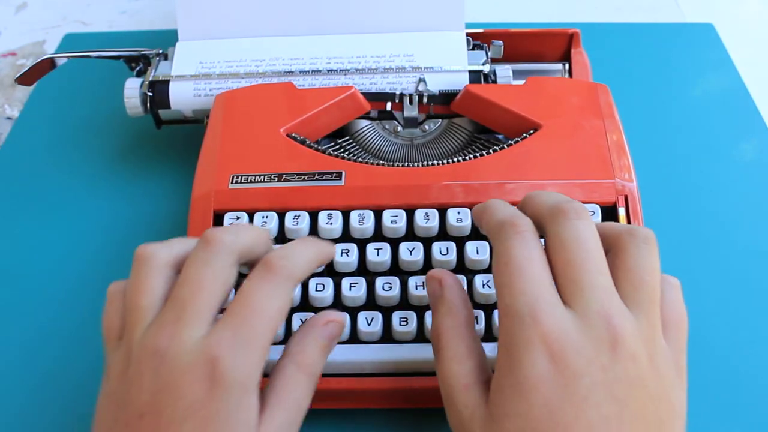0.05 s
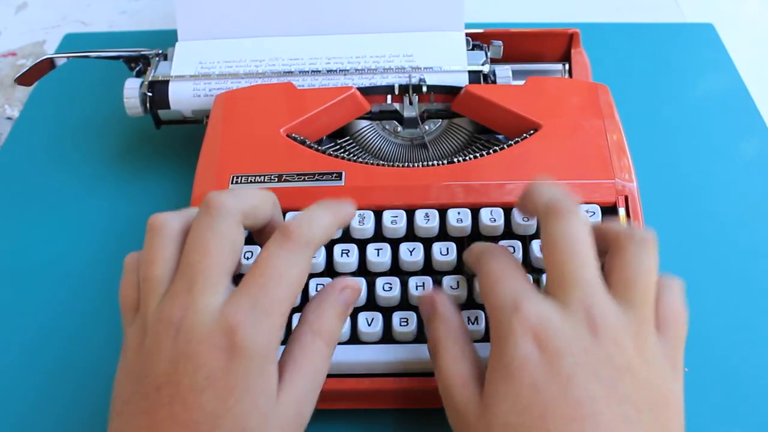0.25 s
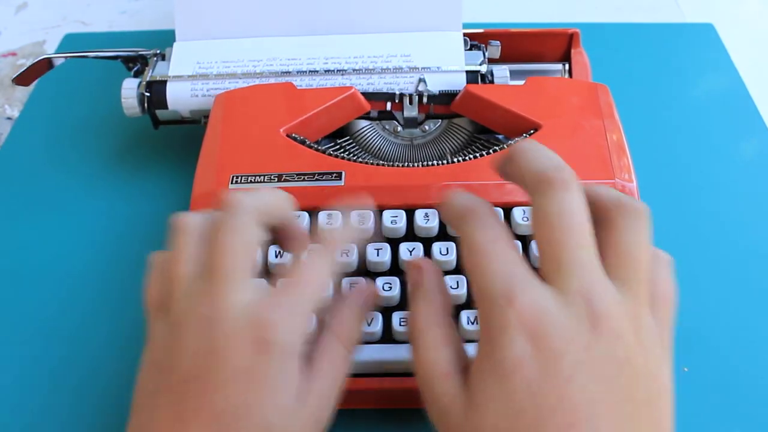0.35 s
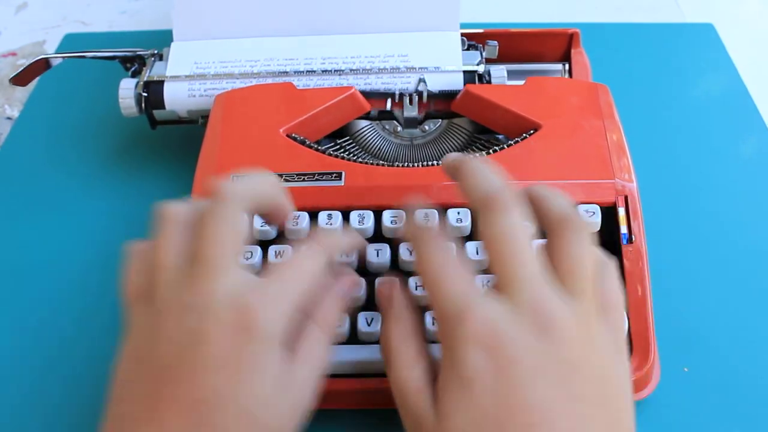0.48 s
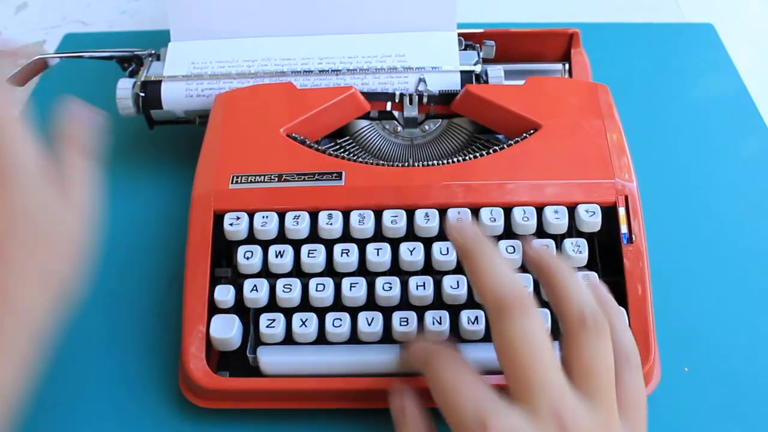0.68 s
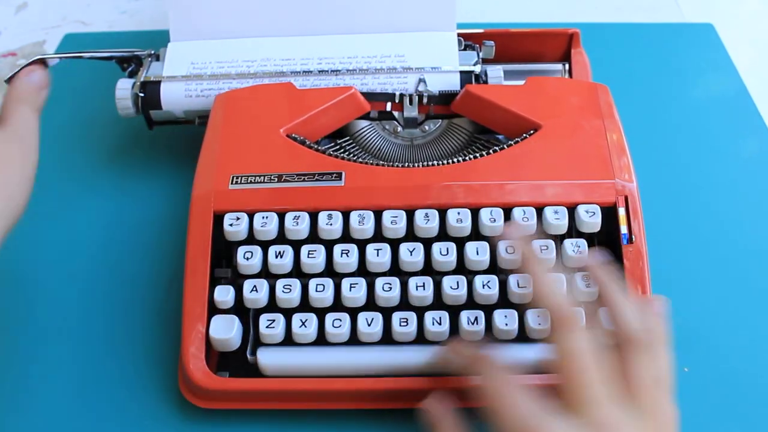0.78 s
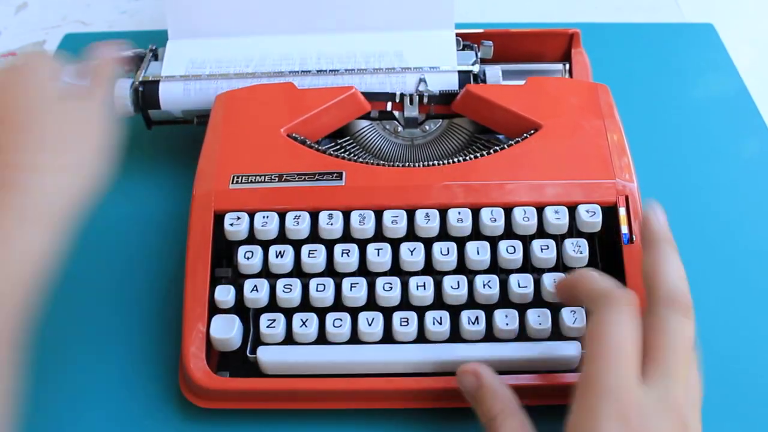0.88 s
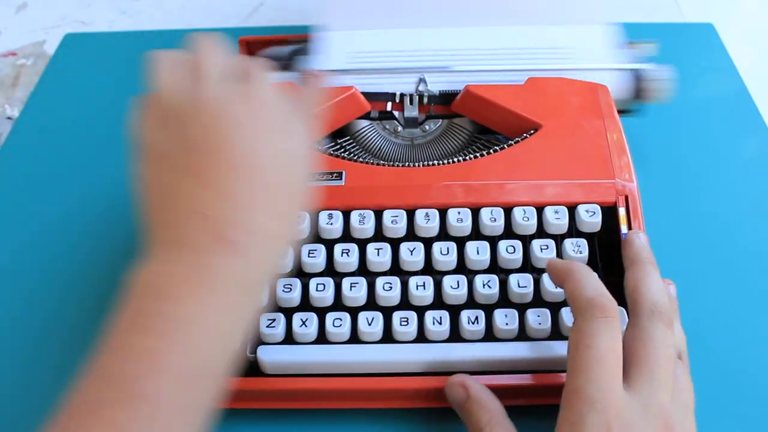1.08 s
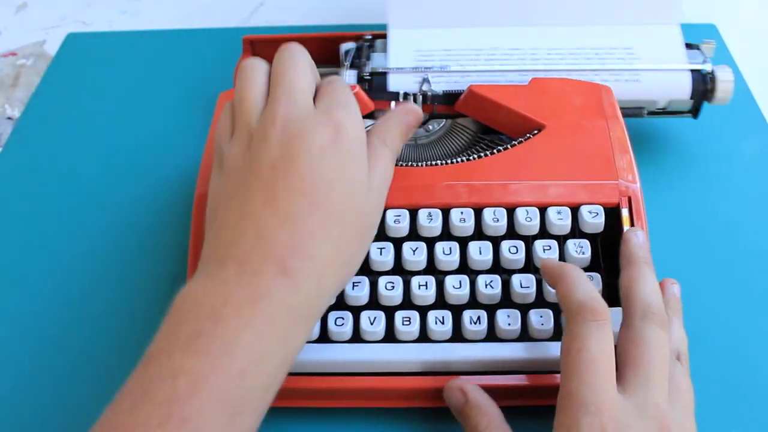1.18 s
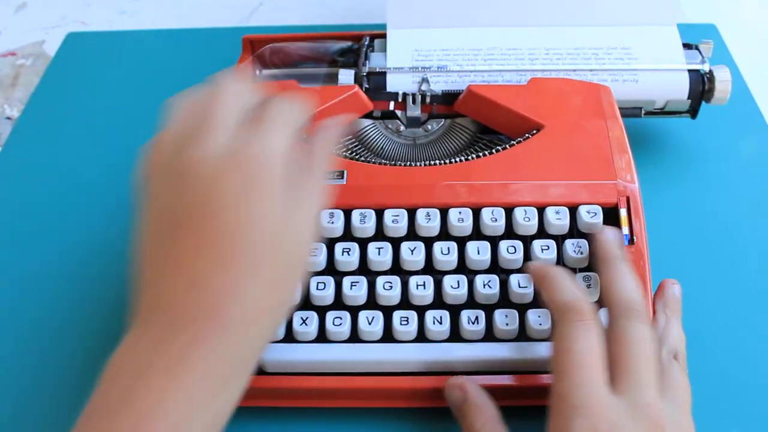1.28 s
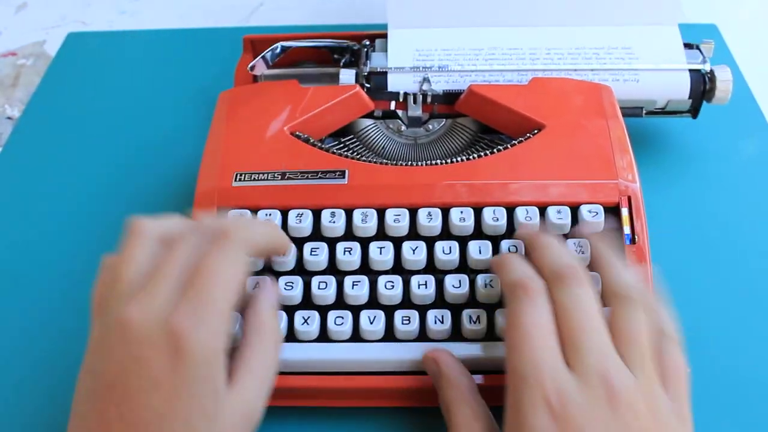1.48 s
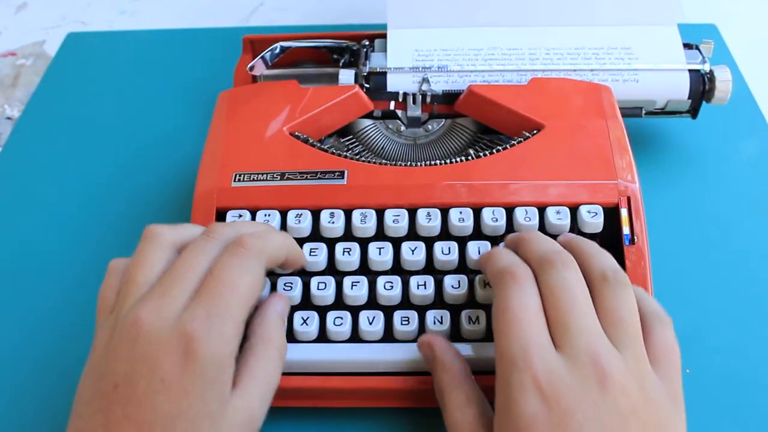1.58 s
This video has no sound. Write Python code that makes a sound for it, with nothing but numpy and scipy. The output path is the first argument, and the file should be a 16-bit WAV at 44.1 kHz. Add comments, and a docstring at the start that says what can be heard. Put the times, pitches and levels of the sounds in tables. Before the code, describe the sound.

A small mechanical typewriter types three letters, then its carriage ratchets, slides back and slams home.

```python
"""A quiet room: a small manual typewriter on a desk, heard close. Three letters and the space bar, then the
return lever ratchets the platen, the carriage slides on its rail and slams into the margin stop, and the
lever springs back. Contacts are fading sprays of tiny knocks filtered by damped modes and a broad shell
response; desk modes thump, filtered knocks make the slide, thin steel sings as sines, the room is
coloured noise."""
import sys
import numpy as np
from scipy import signal
from scipy.fft import rfft, irfft
from scipy.io import wavfile
from scipy.ndimage import uniform_filter1d

SR = 44100
rng = np.random.default_rng(int(sys.argv[2]) if len(sys.argv) > 2 else 0)


def to_linear_factor(level_db):
    """Convert decibel levels (scalar or array-like) to linear amplitude factors."""
    exponent = np.asarray(level_db, float) / 20
    return 10 ** exponent


def log_audio(samples):
    """Write samples as a 16-bit WAV file to the path given in sys.argv[1]."""
    # one column per channel
    frames = np.atleast_2d(samples).T
    # limit to full scale, then quantise
    limited = np.clip(frames, -1, 1)
    pcm = np.round(limited * 32767).astype(np.int16)
    wavfile.write(sys.argv[1], SR, pcm)


N = 72765
SIZE = 16384  # samples per contact

# frame modes: (frequency [Hz], level [dB], t60 [s])
FRAME_MODES = [(620, -6, .03), (770, -3, .03), (940, -3, .03), (1100, -5, .025), (1450, -5, .022),
               (1790, -3, .025), (1960, -2, .025), (2740, -3, .015), (3100, -5, .015), (3850, -5, .012),
               (4700, -6, .012), (5200, -6, .01), (5900, -8, .01), (6600, -9, .01), (10000, -14, .012)]
# treble softened by the air on its way to the microphone: (frequency [Hz], level [dB])
AIR_LOSS = [(8000, 0), (11000, -3), (13000, -6.5), (14500, -13), (16000, -24)]


def unit(x):
    """Scale to rms 1."""
    return x / np.sqrt(np.mean(np.abs(x) ** 2))


def colour(points, size):
    """Causal (minimum-phase) response through (Hz, dB) points, by folding the cepstrum."""
    point_hz, point_db = np.array(points).T
    hz = np.maximum(np.fft.rfftfreq(size, 1 / SR), 1)
    log_gain = np.interp(np.log(hz), np.log(point_hz), point_db) * np.log(10) / 20
    cepstrum = irfft(log_gain, size)
    cepstrum[1:size // 2] *= 2
    cepstrum[size // 2 + 1:] = 0
    return np.exp(rfft(cepstrum))


def rings(modes, size, extra_db=0):
    """Spectrum of a sum of exponentially damped sine modes, rms 1."""
    t = np.arange(SIZE // 2)[:, None] / SR
    hz, db, t60_s = np.array(modes).T
    response = to_linear_factor(db + extra_db - 60 * t / t60_s) * np.sin(2 * np.pi * hz * t)
    return unit(rfft(response.sum(axis=1), size))


def knocks(count):
    """Dense tiny metal contacts of uneven size, rms 1."""
    scatter_db = 2
    size_db = -scatter_db * np.log(rng.random(count) + 1e-9)
    return unit(to_linear_factor(size_db) * rng.standard_normal(count))


def add(out, start_s, x, db):
    """Mix x into out at a time and level."""
    i = int(start_s * SR)
    n = min(len(x), N - i)
    out[i:i + n] += x[:n] * to_linear_factor(db)


def clatter(contacts, modes):
    """Fading sprays of knocks; each contact favours one listed mode, the others scattered at random."""
    shell_db, ring_scatter_db, favour_db = 3, 3, 10
    snap_db, snap_t60_s, spray_s = -14.5, 0.002, 0.15  # snap: first touch, over the spray
    # unresolved plates: (frequency [Hz], level [dB per Hz])
    plates = [(180, -39.5), (300, -8.5), (584, 3.5), (762, 9.5), (1190, 1), (1780, 6), (3500, 0),
              (6200, -6), (9000, -8.5), (12000, -13), (16000, -35)]
    out, t = np.zeros(N), np.arange(SIZE) / SR
    shell = to_linear_factor(shell_db) * unit(colour(plates, SIZE))
    air_loss = colour(AIR_LOSS, SIZE)
    mode_hz = np.array(modes)[:, 0]
    for start_s, db, t60_s, tilt_db, ring_hz in contacts:
        fade = to_linear_factor(-60 * t / t60_s) + to_linear_factor(snap_db - 60 * t / snap_t60_s)
        spray = knocks(SIZE) * fade * (t < spray_s)
        mode_db = ring_scatter_db * rng.standard_normal(len(mode_hz))
        nearest = np.argmin(np.abs(np.log(mode_hz / ring_hz)))
        mode_db[nearest] = favour_db
        # three octaves either side of 2400 Hz
        tilt = colour([(300, -3 * tilt_db), (2400, 0), (19200, 3 * tilt_db)], SIZE)
        body = unit(tilt * air_loss * (rings(modes, SIZE, mode_db) + shell))
        add(out, start_s, irfft(rfft(spray) * body, SIZE)[:SIZE * 3 // 4], db)
    return out


def room_tone():
    """Soft hiss of the room and of hands moving: coloured noise with a slow level curve."""
    # hiss spectrum: (frequency [Hz], level [dB per Hz])
    hiss_colour = [(15, 6), (40, 5.5), (150, -1), (270, 0), (405, -1), (750, -2), (1370, -2), (3000, -13.5),
                   (6000, -25), (10000, -35.5), (16000, -55)]
    # hiss level: (time [s], level [dB])
    hiss_level = [(0, -46.5), (.22, -42), (.62, -47.5), (1.299, -38), (1.65, -43)]
    time_s, level_db = np.array(hiss_level).T
    noise = rng.standard_normal(N + 1)
    hiss = unit(irfft(rfft(noise) * colour(hiss_colour, N + 1), N + 1)[:N])
    return hiss * to_linear_factor(np.interp(np.arange(N) / SR, time_s, level_db))


def echo(machine):
    """Short dull echo: convolution with decaying low-passed noise of unit energy."""
    echo_db, t60_s, cutoff_hz = -21, 0.16, 3530
    t = np.arange(SIZE) / SR
    noise = signal.lfilter(*signal.butter(3, cutoff_hz, fs=SR), rng.standard_normal(SIZE))
    tail = noise * to_linear_factor(-60 * t / t60_s)
    tail = tail / np.sqrt(np.sum(tail ** 2))
    return to_linear_factor(echo_db) * signal.fftconvolve(machine, tail)[:N]


def pings():
    """Faint sustained partials of springs and thin bars: decaying sines, then damped."""
    rise_s, damp_s = 0.00067, 0.008
    # singing steel: (start [s], damped at [s], t60 [s], partials (frequency [Hz], level [dB]))
    thin_steel = [(0, 0.22, 1.1, [(8603, -56)]), (0.17, 0.243, 0.69, [(4522, -58), (6621, -60), (8759, -61),
                  (9798, -69), (10158, -73), (11003, -78), (12414, -67), (13491, -78)]),
                  (1.41, 1.56, 0.97, [(11400, -72)])]
    t, out = np.arange(N) / SR, np.zeros(N)
    for start_s, end_s, t60_s, partials in thin_steel:
        gate = np.clip((t - start_s) / rise_s, 0, 1) * np.clip((end_s - t) / damp_s, 0, 1)
        decay_db = -60 * np.maximum(t - start_s, 0) / t60_s
        for hz, db in partials:
            sine = np.sin(2 * np.pi * (hz * t + rng.random()))
            out += gate * to_linear_factor(db + decay_db) * sine
    return out


def thumps():
    """Soft pushes through the feet ring the desk, the mode levels scattered at random."""
    push_s, mode_scatter_db = 0.0028, 3
    # desk modes: (frequency [Hz], level [dB], t60 [s])
    desk_modes = [(59.6, -9, 0.084), (109.9, 4, 0.168), (144, -0.5, 0.092), (210, 0, 0.068),
                  (282, -13, 0.025)]
    # pushes: (time [s], peak level [dB])
    pushes = [(0.236, -31.5), (0.263, -30), (0.34, -31), (0.422, -34), (0.445, -28), (0.532, -35),
              (0.576, -34), (0.664, -42), (0.751, -30.5), (0.846, -32), (0.873, -33), (0.941, -22.5),
              (0.956, -31.5), (1.209, -19.5), (1.225, -25), (1.26, -24), (1.338, -27), (1.387, -36.5)]
    out = np.zeros(N)
    push = np.diff(np.hanning(int(push_s * SR)))
    for start_s, db in pushes:
        scatter_db = mode_scatter_db * rng.standard_normal(len(desk_modes))
        ringing = irfft(rings(desk_modes, SIZE, scatter_db), SIZE)[:SIZE // 2]
        thump = np.convolve(ringing, push)
        add(out, start_s, thump / np.abs(thump).max(), db)
    return out


def slide():
    """Rollers grind along the rail: dense knocks ring the frame, catching unevenly in each register."""
    ring_db, patchy_db = -13.5, 1.3
    # carriage on its rail: (time [s], level [dB])
    travel = [(.955, -64), (0.976, -35), (1.05, -34.5), (1.1, -32), (1.19, -31), (1.209, -33.5)]
    # grind spectrum: (frequency [Hz], level [dB per Hz])
    grind_colour = [(35, -23), (60, -11), (130, 1), (256, -13), (500, -14), (750, 1.5), (1900, -5),
                    (4750, -7.5), (7000, -12), (9350, -21), (13000, -29), (16000, -45)]
    # register edges: (frequency [Hz])
    band_edges_hz = (20, 500, 1200, 2500, 5000, 9000, 20000)
    time_s, level_db = np.array(travel).T
    body = unit(colour(grind_colour, N + 1)) + to_linear_factor(ring_db) * rings(FRAME_MODES, N + 1)
    spectrum = rfft(knocks(N), N + 1) * body * colour(AIR_LOSS, N + 1)
    hz = np.fft.rfftfreq(N + 1, 1 / SR)
    grind = np.zeros(N)
    for low_hz, high_hz in zip(band_edges_hz, band_edges_hz[1:]):
        band = irfft(spectrum * ((hz >= low_hz) & (hz < high_hz)), N + 1)[:N]
        wobble = uniform_filter1d(rng.standard_normal(N), size=160)
        wobble = unit(uniform_filter1d(wobble, size=80))
        grind += band * to_linear_factor(patchy_db * wobble)
    level = np.interp(np.arange(N) / SR, time_s, level_db, left=-120, right=-120)
    return unit(grind) * to_linear_factor(level)


def linkage():
    """Key levers, ribbon lift, escapement and space bar clatter on the frame."""
    # (time [s], level [dB], fade t60 [s], tilt [dB per octave], favoured ring [Hz])
    link_contacts = [(.2330, -21.5, 0.091, 1.5, 1450), (.246, -22.5, 0.075, -2, 940),
                     (.2578, -19.5, 0.052, 2, 3100), (.280, -34, 0.022, 1.5, 5900),
                     (.326, -29, 0.023, 1, 3100), (.336, -31, 0.072, 4, 10000), (.350, -30, .1, 1.5, 940),
                     (.361, -26.5, 0.058, 0, 1790), (.396, -38.5, 0.073, -0.5, 5900),
                     (.4205, -21.5, 0.032, .5, 2740), (.430, -28, 0.17, -1.5, 940),
                     (.4405, -22.5, 0.094, 5.5, 4700), (.462, -28, 0.036, 0, 5900),
                     (.512, -32.5, 0.056, 3.5, 3100), (.521, -37, 0.1, 4, 10000),
                     (.535, -29.5, 0.076, -1, 3100), (.546, -30, 0.11, -2, 940),
                     (.558, -30, 0.2, -2.5, 1100), (.5725, -40, 0.18, 2.5, 5900),
                     (.595, -23.5, 0.02, 0.5, 5900), (.643, -39, 0.033, 8, 3100),
                     (.653, -38.5, .06, 6, 10000), (.664, -33, 0.11, 1, 3100), (.675, -31.5, .05, -3, 1790),
                     (.700, -53, 0.091, 13, 5900), (.711, -41, 0.032, 1.5, 1450),
                     (.740, -40.5, 0.12, -2, 1450), (.7535, -19, 0.042, -2, 770),
                     (.765, -24.5, 0.069, -5, 1450), (.757, -17.5, 0.032, -3.5, 940),
                     (.807, -28, 0.017, -4, 1450), (.828, -40.5, .04, 0, 1960),
                     (1.559, -41.5, 0.09, 6.5, 5900), (1.571, -27, 0.017, -5.5, 1960),
                     (1.585, -36, 0.15, -7, 1790)]
    return clatter(link_contacts, FRAME_MODES)


def ratchet():
    """Return lever clicks the platen ratchet, then picks up the carriage, ringing the frame."""
    # (time [s], level [dB], fade t60 [s], tilt [dB per octave], favoured ring [Hz])
    ratchet_contacts = [(0.843, -23, 0.077, 0, 1960), (0.858, -18.5, 0.037, -1.5, 6600),
                        (0.876, -21, 0.041, -2, 1960), (0.88, -27, 0.17, -4.5, 1450),
                        (0.898, -31, 0.061, -2.5, 1450), (0.914, -29, 0.2, -1, 2740),
                        (0.931, -24.5, 0.031, 2, 5200), (.935, -26, 0.11, 1.5, 1960),
                        (0.945, -20.5, 0.077, 0.5, 1960), (.950, -21.5, 0.091, -14, 1960),
                        (.961, -48, 0.041, -10, 940), (1.095, -36, .02, 7, 3850)]
    return clatter(ratchet_contacts, FRAME_MODES)


def margin_stop():
    """Carriage hits the margin stop and rebounds, ringing the frame."""
    # (time [s], level [dB], fade t60 [s], tilt [dB per octave], favoured ring [Hz])
    stop_contacts = [(1.206, -16, 0.13, 3, 3850), (1.213, -12, 0.094, -2.5, 1790),
                     (1.22, -14, 0.086, 1.5, 940), (1.232, -14.5, 0.06, -2, 1960),
                     (1.263, -23, 0.052, -3, 1960)]
    return clatter(stop_contacts, FRAME_MODES)


def lever_return():
    """Lever springs home, its contacts ringing the arm's own modes."""
    # (time [s], level [dB], fade t60 [s], tilt [dB per octave], favoured ring [Hz])
    lever_contacts = [(1.316, -47, .05, 1.5, 3630), (1.3243, -14.5, 0.026, 3.5, 3630),
                      (1.328, -30.5, 0.27, -2.5, 2000), (1.340, -10.5, 0.014, 3.5, 3630),
                      (1.345, -19, 0.053, 5, 2730), (1.383, -22.5, 0.045, 6.5, 4800),
                      (1.392, -25, 0.074, -4.5, 716), (1.412, -24, 0.044, 4.5, 3630),
                      (1.435, -36.5, 0.05, 3.5, 2000), (1.455, -47, 0.028, 3, 5700)]
    # lever arm modes: (frequency [Hz], level [dB], t60 [s])
    arm_modes = [(716, -12, .025), (2000, -8, .012), (2730, -6, .01), (3630, 0, .014), (4800, -5, .008),
                 (5700, -8, .008), (7200, -10, .008), (8200, -11, .008)]
    return clatter(lever_contacts, arm_modes)


def strikes():
    """Type slug on the platen: a bright noise crack, then the type bar and frame clatter on."""
    crack_band_hz, hold_s, crack_t60_s, air_db = [3800, 7800], 0.0009, 0.003, -15
    clatter_t60_s, tilt_db_per_octave, ring_hz = 0.054, 1.8, 3850
    # slug hits: (time [s], crack peak [dB], clatter level [dB])
    slug_hits = [(0.2646, 8.5, -12.5), (0.4472, 6.5, -15.5), (0.5784, 1, -17.5)]
    contacts = [(start_s + hold_s, clatter_db, clatter_t60_s, tilt_db_per_octave, ring_hz)
                for start_s, _, clatter_db in slug_hits]
    out = clatter(contacts, FRAME_MODES)
    t = np.arange(1024) / SR
    fade = to_linear_factor(-60 * np.maximum(t - hold_s, 0) / crack_t60_s)
    b, a = signal.butter(1, crack_band_hz, "band", fs=SR)
    for start_s, peak_db, _ in slug_hits:
        burst = rng.standard_normal(1024) * fade
        burst[0] = 4  # the slap itself
        air = to_linear_factor(air_db) * np.diff(burst, prepend=0)
        crack = signal.lfilter(b, a, burst) + air
        add(out, start_s, crack / np.abs(crack).max(), peak_db)
    return out


def scene():
    """Machine, its short dull echo, singing steel and the room."""
    machine = thumps() + slide() + linkage() + ratchet() + margin_stop() + lever_return() + strikes()
    mix = room_tone() + echo(machine) + pings() + machine
    return mix[None]


def top_cut(x):
    """Nothing passes above the cut-off."""
    return signal.sosfilt(signal.butter(12, 16270, fs=SR, output="sos"), x)


def record(dry):
    """The loudest cracks overload the input and clip; top and bottom are filtered off."""
    clip_level, top_hz, low_cut_hz = 1.02, 14500, 68
    x = np.clip(dry, -clip_level, clip_level)
    x = signal.sosfilt(signal.butter(6, top_hz, fs=SR, output="sos"), x)
    x = signal.sosfilt(signal.butter(2, low_cut_hz, "high", fs=SR, output="sos"), x)
    return top_cut(x)


dry = scene()
out = record(dry)
log_audio(out)
```